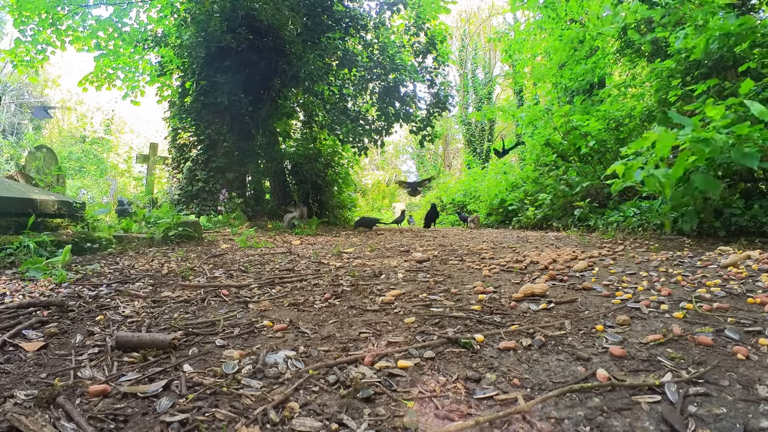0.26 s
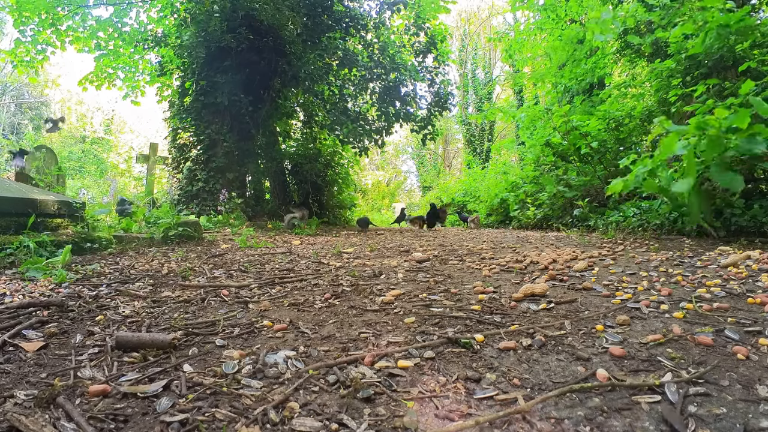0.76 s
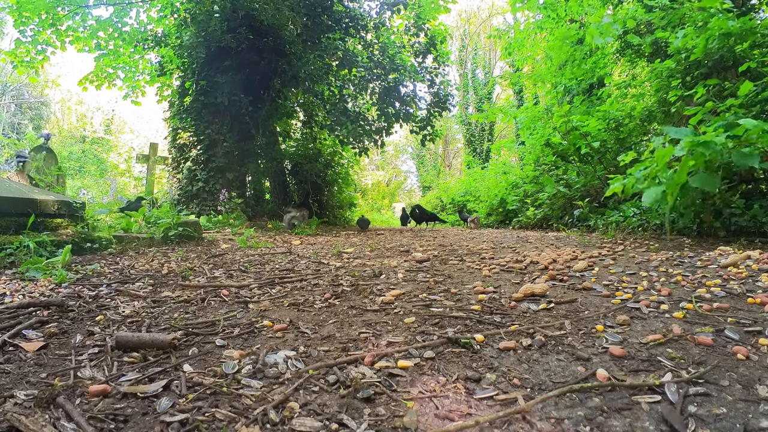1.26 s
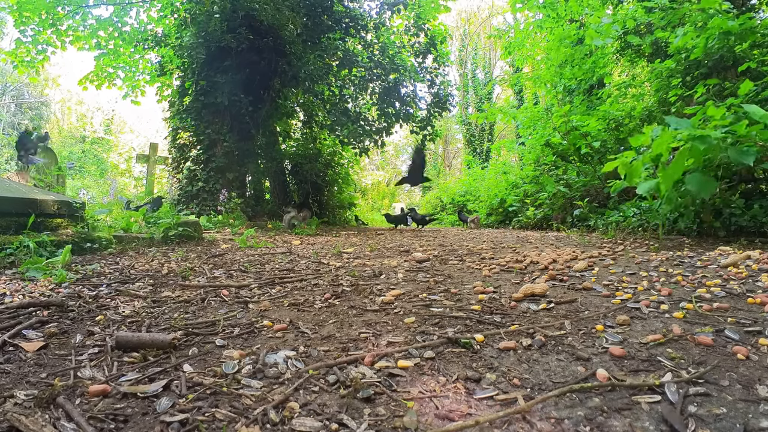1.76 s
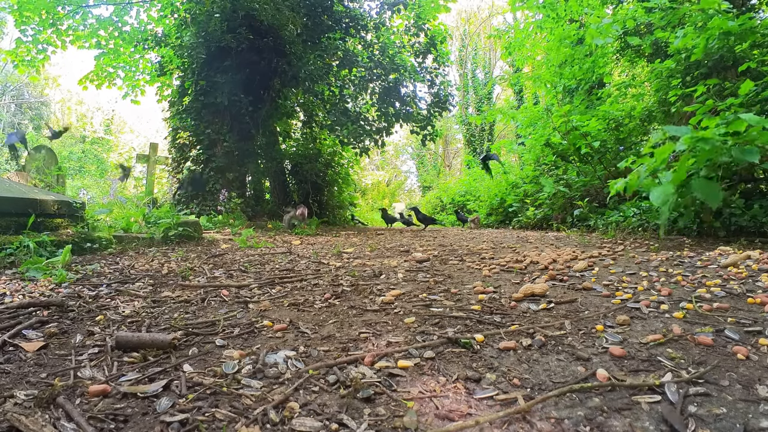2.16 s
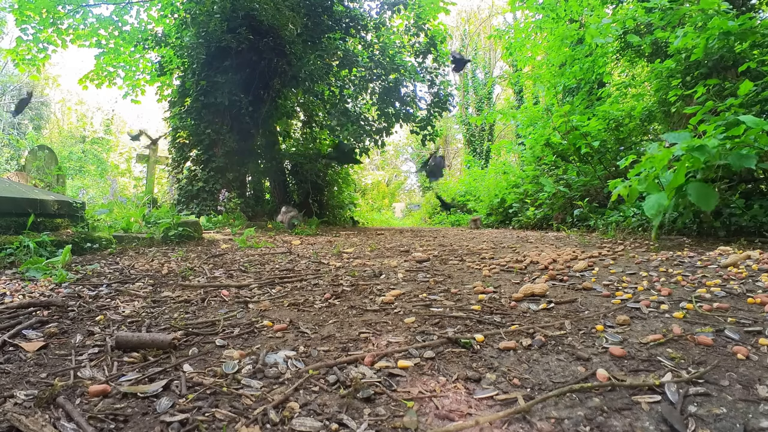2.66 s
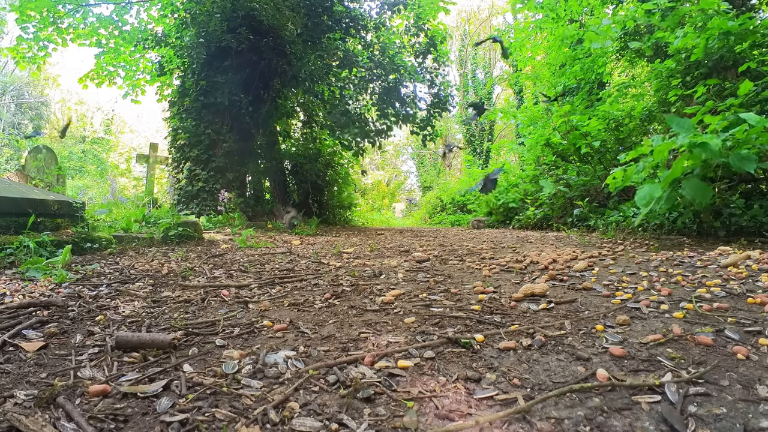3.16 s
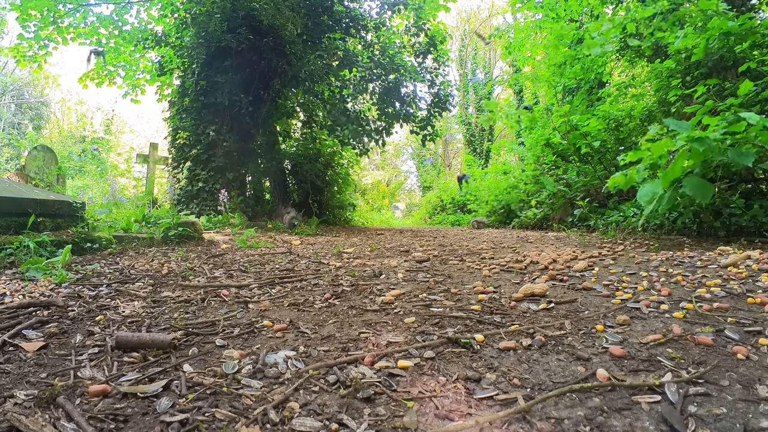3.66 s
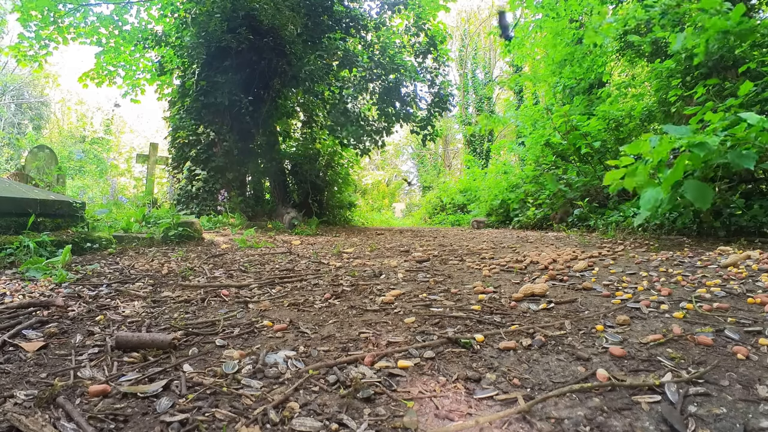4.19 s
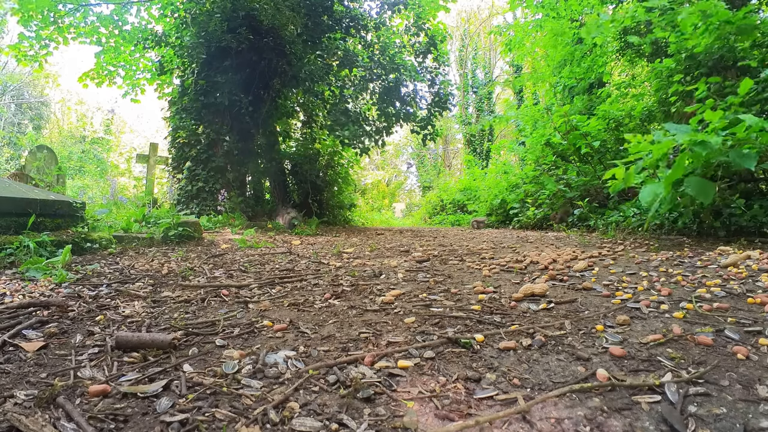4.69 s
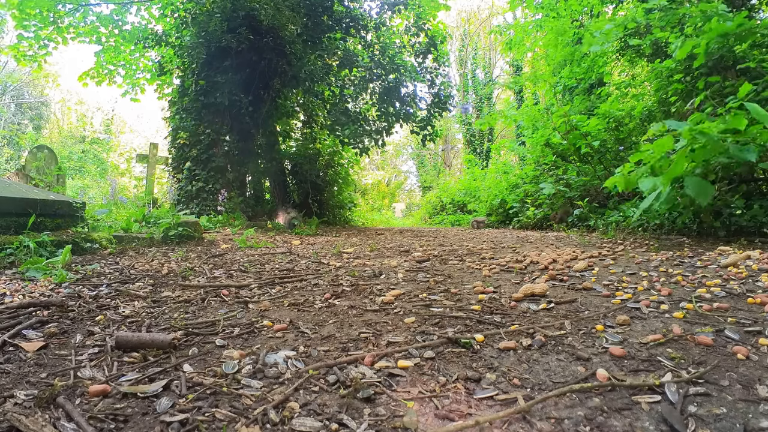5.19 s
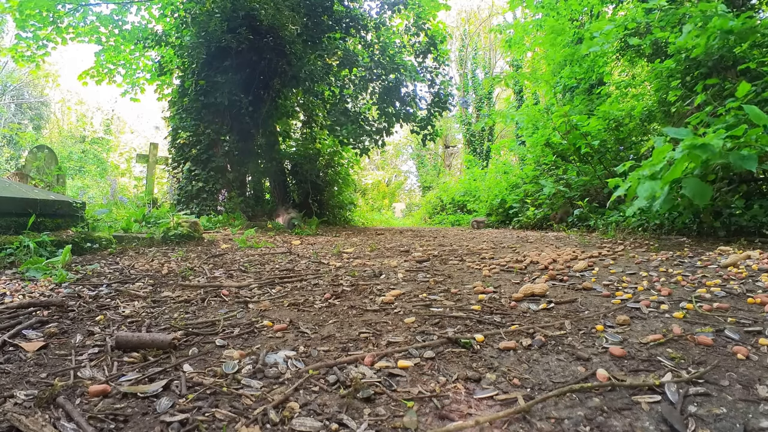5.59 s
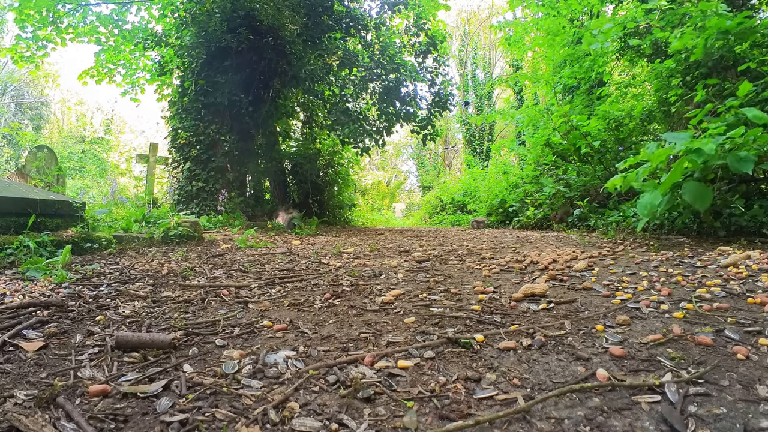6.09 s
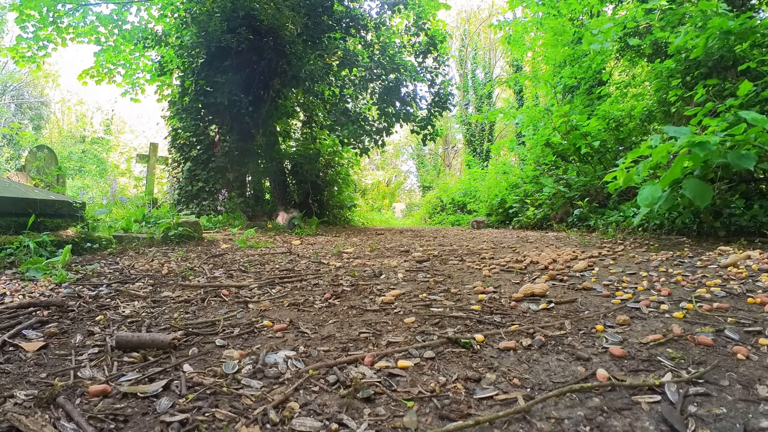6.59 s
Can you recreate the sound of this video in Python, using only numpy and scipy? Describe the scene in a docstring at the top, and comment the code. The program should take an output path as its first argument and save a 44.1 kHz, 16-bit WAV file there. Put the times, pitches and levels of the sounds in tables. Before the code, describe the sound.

Quiet woodland, with a faint hum of distant traffic and a soft hiss of leaves throughout. Light wind bumps the microphone in low buffets, strongest from about 0.3 to 1.3 seconds, among a few small rustles. From 0.9 seconds a bird in the canopy repeats a short falling call, about four a second, with a brief echo among the trunks. Near 2 seconds crows flush off the ground: wing strokes thump and swish, feathers give tiny whistles, dry leaves rustle and twigs tick. The flurry is fullest from 2.4 to 3 seconds, then thins out by about 4.5. From 3 seconds the calls turn hoarse and more widely spaced, ending just after 5 seconds. A few softer wind bumps come around then. Light breeze, scattered leaf rustles and small twig snaps continue until the end, near 7 seconds.

```python
"""Woodland. Light wind buffets the microphone over a far hum of traffic and leaves.
From 0.9 s a bird in the canopy repeats a short falling call that the trunks smear into echoes.
Near 2 s crows flush off the ground: wing strokes thump, swish and whistle, dry leaves rustle, twigs tick.
The flock thins out while the calls turn hoarse; they end after 5 s, leaving wind, rustles and snaps."""
import sys
import numpy as np
from scipy import signal
from scipy.fft import rfft, irfft, next_fast_len
from scipy.io import wavfile
from scipy.ndimage import uniform_filter1d, map_coordinates

SR = 44100
rng = np.random.default_rng(int(sys.argv[2]) if len(sys.argv) > 2 else 0)


def generate_wav(signal):
    """Clip the signal to [-1, 1] and save it as 16-bit WAV at the path in sys.argv[1]."""
    frames = np.transpose(np.atleast_2d(signal))
    scaled = np.clip(frames, -1, 1) * 32767
    pcm = np.round(scaled).astype(np.int16)
    wavfile.write(sys.argv[1], SR, pcm)


N = 301854

# Breeze in the trees. Each row: time in seconds, murmur in dB, leaf hiss in dB.
BREEZE = [(0, -65.5, -75), (.27, -70.5, -75.5), (1.2, -71, -80.5), (1.7, -75.5, -82.5),
          (1.87, -65.5, -66.5), (2.1, -75.5, -81), (3.2, -79, -71.5), (4.0, -83.5, -82), (4.6, -72.5, -81),
          (5.9, -66, -75), (6.34, -63.5, -66.5), (6.5, -67, -77.5), (6.84, -65, -75.5)]
# Common rush of the flock. Each row: time in seconds, level in dB.
FLOCK = [(0, -110), (2.0, -110), (2.15, -72), (2.45, -55), (2.6, -52), (2.75, -59), (3.05, -58.5),
         (3.2, -66), (3.8, -70), (4.3, -75.5), (4.6, -76.5), (6.84, -110)]
# Feather and leaf swishes. Each row: peak time and half length in seconds, level in dB, centre in Hz.
SWISHES = [(0.01, 0.057, -70.5, 7250), (0.125, 0.08, -76, 9560), (0.308, 0.033, -75.5, 9600),
           (0.458, 0.048, -64, 7460), (0.507, 0.019, -73, 7400), (0.937, 0.025, -68, 7000),
           (1.209, 0.0081, -66, 5500), (1.803, 0.015, -62, 5660), (1.847, 0.0044, -56, 7840),
           (1.857, 0.014, -66, 12500), (1.973, .012, -68, 12500), (1.972, 0.015, -53, 4800),
           (2.2, 0.014, -61, 5100), (2.303, 0.042, -58.5, 2820), (2.4, 0.0093, -65, 5700),
           (2.492, 0.011, -59.5, 6650), (2.799, 0.035, -60.5, 6100), (2.899, 0.018, -47, 4700),
           (2.94, 0.014, -58, 5200), (3.02, 0.0099, -61, 5840), (3.403, 0.032, -69, 6260),
           (3.668, 0.084, -70.5, 6000), (3.903, 0.016, -74, 7560), (4.018, 0.075, -72, 5540),
           (4.297, 0.063, -70, 5500), (4.859, 0.022, -59.5, 3870), (5.14, 0.027, -72, 6270),
           (5.38, 0.021, -76.5, 6800), (5.454, 0.0057, -64.5, 5370), (5.476, 0.023, -66, 5100),
           (5.843, 0.016, -62.5, 6640), (6.166, 0.024, -63.5, 6740), (6.227, 0.017, -60, 4170),
           (6.31, 0.039, -53.5, 3940), (6.418, 0.035, -64, 6500), (6.462, 0.028, -64, 3900),
           (6.621, 0.018, -74.5, 9000), (6.76, 0.0091, -70, 2720)]


def amp(db):
    """Decibels to gain."""
    return 10 ** (np.asarray(db) / 20)


def unit(x):
    """Scaled to rms 1."""
    return x / np.sqrt(np.mean(x ** 2) + 1e-20)


def bell(x, width):
    """Gaussian of height 1."""
    return np.exp(-.5 * (x / width) ** 2)


def along(points, hz):
    """Interpolates (Hz, value) points on a log axis."""
    f, v = np.transpose(points)
    return np.interp(np.log(hz + 1), np.log(f + 1), v)


def curves(rows):
    """One value per sample for each column after the time."""
    s, *cols = np.transpose(rows)
    return [np.interp(np.arange(N) / SR, s, c) for c in cols]


def wobble(rate_hz, size=N):
    """Smooth random curve, rate_hz knots a second."""
    knots = rng.standard_normal(int(size * rate_hz / SR) + 4)
    return map_coordinates(knots, [np.arange(size) * rate_hz / SR])


def phase_of(hz):
    """Running phase in radians."""
    return 2 * np.pi * np.cumsum(hz) / SR


def filtered(x, response):
    """Applies a complex frequency response."""
    m = next_fast_len(len(x) + 8192)
    return irfft(rfft(x, m) * response(np.fft.rfftfreq(m, 1 / SR)), m)[:len(x)]


def shaped(x, spectrum):
    """Filtered by (Hz, dB) points, rms 1."""
    return unit(filtered(x, lambda hz: amp(along(spectrum, hz))))


def add(track, s, sound):
    """Mixes a sound in at s seconds."""
    part = track[max(round(s * SR), 0):][:len(sound)]
    part += sound[:len(part)]


def rush(spectrum, patchy_db):
    """Noise of rms 1 with patches of random gain."""
    z = signal.stft(rng.standard_normal(N), nperseg=512)[2]
    patches = uniform_filter1d(uniform_filter1d(rng.standard_normal(z.shape), 6, 0), 10, 1)
    noise = signal.istft(z * amp(patchy_db * unit(patches)), nperseg=512)[1][:N]
    return shaped(noise, spectrum)


def puffs(rows, octaves, grain_db, grain_hz, rise):
    """Bursts of turbulent band noise; rise is attack time over fade time."""
    out = np.zeros(N)
    for s, half_s, db, hz in rows:
        reach_s = 4 * half_s + .03
        t = np.arange(-min(s, reach_s) * SR, reach_s * SR) / SR
        grainy = rng.standard_normal(len(t)) * amp(grain_db * wobble(grain_hz, len(t)))
        air = filtered(grainy, lambda f: bell(np.log2((f + 1) / hz), octaves))
        envelope = bell(t, np.where(t < 0, rise * half_s, half_s))
        add(out, s + t[0], amp(db) * unit(air * envelope) * np.sqrt(np.mean(envelope ** 2)))
    return out


def echoes(x, direct_db, wet_db, build_s=.014):
    """Echo among trunks: it gathers briefly, then each frequency dies at its own speed."""
    # Each row: frequency in Hz, time to fall 60 dB in seconds.
    decay = [(300, 0.051), (3000, 0.43), (10000, 0.33)]
    hz, t, z = signal.stft(rng.standard_normal(SR // 2), SR, nperseg=256)
    envelope = amp(-60 * t / along(decay, hz)[:, None]) * (1 - np.exp(-t / build_s))
    tail = signal.istft(z * envelope, SR, nperseg=256)[1]
    wet = signal.fftconvolve(x, tail / np.linalg.norm(tail))
    return amp(wet_db) * wet + amp(direct_db) * np.pad(x, (0, len(wet) - len(x)))


def background():
    """Wind rumble, far murmur of traffic and trees, and leaf hiss, each drifting a little."""
    # Noise spectra. Each row: frequency in Hz, relative density in dB.
    rumble = [(25, -28), (60, 4), (100, 4), (190, 1.5), (320, -10.5), (500, -23.5), (700, -50), (1100, -54)]
    murmur = [(150, 0), (250, 3.5), (384, -1.5), (560, -2.5), (800, -8.5), (1600, -7), (3560, -17),
              (4000, -26.5), (5200, -11.5), (8800, -120)]
    hiss = [(1500, -50), (2500, -0.5), (4000, -3.5), (6000, -7), (9000, -9), (12500, -19.5), (13500, -19),
            (15600, -36)]
    # Wind at the microphone. Each row: time in seconds, rumble in dB.
    gusts = [(0, -57), (.27, -54), (.55, -44.5), (.76, -74), (1.0, -52.5), (1.25, -58.5), (1.45, -64),
             (1.9, -61), (2.0, -61.5), (2.05, -71.5), (2.2, -63), (2.44, -56), (2.65, -53.5), (2.95, -62),
             (3.3, -66), (3.8, -70), (4.6, -74), (4.95, -68.5), (5.9, -72), (6.34, -64.5), (6.45, -75),
             (6.84, -81)]
    rumble_db, = curves(gusts)
    murmur_db, hiss_db = curves(BREEZE)
    low = amp(rumble_db + 1.6 * wobble(11)) * rush(rumble, patchy_db=3)
    middle = amp(murmur_db + 1.45 * wobble(4.97)) * rush(murmur, patchy_db=2.5)
    high = amp(hiss_db + 1.2 * wobble(8)) * rush(hiss, patchy_db=.8)
    return low + middle + high


def wind():
    """Lumps of low turbulence on the microphone, each with a shorter, higher edge."""
    # Each row: peak time and half length in seconds, level in dB, centre in Hz.
    buffets = [(0.328, 0.0093, -31, 141), (0.363, 0.0073, -39, 108), (0.38, 0.024, -32.5, 119),
               (0.427, 0.014, -38.5, 140), (.468, 0.031, -39.5, 113), (0.504, 0.0078, -40.5, 150),
               (0.532, 0.0068, -32, 190), (0.598, 0.063, -43, 92), (0.684, 0.012, -43, 113),
               (0.786, 0.024, -43.5, 82), (0.955, 0.087, -55, 92.5), (1.092, 0.014, -45.5, 94),
               (1.208, 0.038, -45.5, 118), (1.276, 0.013, -34.5, 111), (1.35, 0.024, -50, 87),
               (1.458, 0.014, -59, 99), (1.712, 0.021, -58, 93), (1.824, 0.021, -54, 100),
               (4.821, 0.02, -53, 93), (4.896, 0.033, -56, 121), (5.069, 0.011, -49, 78),
               (5.159, 0.023, -44.5, 87), (5.274, 0.0186, -59.5, 90), (5.497, 0.018, -61, 118),
               (6.672, 0.007, -49.5, 99)]
    edges = [(s, .6 * half_s, db - 7.5 + 11 * np.log2(hz / 150), 1.69 * hz)
             for s, half_s, db, hz in buffets]
    return (puffs(buffets, octaves=.59, grain_db=4.5, grain_hz=54.6, rise=.66)
            + puffs(edges, octaves=.64, grain_db=5, grain_hz=47, rise=.65))


def squeaks():
    """Faint breathy squeaks of narrow-band noise."""
    # Each row: peak time and half length in seconds, level in dB, centre in Hz.
    bursts = [(.072, 0.019, -62.5, 5730), (.075, 0.012, -67, 4900), (.32, 0.017, -76, 5500),
              (2.305, 0.012, -52, 2300), (6.315, 0.031, -57, 2880), (6.31, 0.0217, -63.5, 4870),
              (6.462, 0.018, -63.5, 2900), (6.635, 0.013, -65, 3350), (6.64, 0.017, -67, 4800),
              (6.725, .012, -69, 1820), (6.82, 0.011, -74, 1620)]
    return puffs(bursts, octaves=.09, grain_db=-4.5, grain_hz=93, rise=.65)


def crackle(band_ticks_per_s=1200, spread_db=4):
    """Fine ticks of leaf and quill that follow the swishes, the flock and the breeze."""
    # Tick spectrum. Each row: frequency in Hz, relative density in dB.
    spectrum = [(1500, -30), (3000, -2.5), (6000, 6.5), (10000, -3), (15600, -28)]
    # Band centres in Hz.
    bands_hz = (3500, 5500, 8000, 11000)
    t, ticks = np.arange(N) / SR, np.zeros(N)
    for centre_hz in bands_hz:
        hits = rng.random(N) < band_ticks_per_s / SR
        sizes = amp(spread_db * rng.exponential(size=N).clip(0, 3)) * rng.standard_normal(N)
        band = lambda hz: amp(along(spectrum, hz)) * bell(np.log2((hz + 1) / centre_hz), .3)
        ticks += filtered(hits * sizes, band)
    stir = sum(amp(db - 11.5) * bell(t - s, half_s) for s, half_s, db, _ in SWISHES)
    flock_db, hiss_db = curves(FLOCK)[0], curves(BREEZE)[1]
    return (stir + amp(flock_db - 13.5) + amp(hiss_db - 10)) * unit(ticks)


def swishes():
    """Feathers and dry leaves brush: separately crackling bands under a thin hiss."""
    # Band offsets from the centre in octaves.
    offsets = (-.6, -.2, .2, .6)
    bands = [(s, half_s, db - 3 - 12 * up ** 2, hz * 2 ** up)
             for s, half_s, db, hz in SWISHES for up in offsets]
    hiss = [(s, half_s, db - 11.5, 8500) for s, half_s, db, _ in SWISHES]
    return (puffs(bands, octaves=.2, grain_db=3.5, grain_hz=100, rise=.51)
            + puffs(hiss, octaves=.21, grain_db=-6.5, grain_hz=330, rise=.38))


def twigs(crack_t60_s=.004, splinter_t60_s=.05):
    """Twigs and leaves snap: a sharp crack with a short splintering tail."""
    # Each row: start in seconds, peak in dB, centre in Hz.
    snaps = [(0.4594, -39, 7850), (0.5045, -42, 7800), (1.8438, -43.5, 3280), (1.962, -54, 3880),
             (1.9703, -45, 3050), (2.4005, -50, 6000), (2.444, -47, 6000), (2.573, -50, 5930),
             (2.873, -41, 4900), (2.895, -35, 3940), (2.9, -31, 5000), (2.999, -54, 5000),
             (3.013, -38.5, 5600), (3.0398, -30, 4800), (3.1642, -49, 3810), (3.3997, -50.5, 3800),
             (5.4462, -49, 5970), (5.817, -51, 3300), (5.8312, -50, 8000), (5.835, -46, 8000),
             (6.1496, -50, 6500), (6.153, -45, 7000), (6.1762, -43.5, 7300), (6.217, -48.5, 2550),
             (6.4178, -39.5, 6300), (6.752, -47.5, 2720)]
    t, out = np.arange(SR // 20) / SR, np.zeros(N)
    envelope = amp(-60 * t / crack_t60_s) + amp(-12 - 60 * t / splinter_t60_s)
    for s, db, hz in snaps:
        burst = rng.standard_normal(len(t)) * envelope
        bandpass = lambda f: 1j * f * hz / (hz * hz - f * f + 1j * f * hz)
        crack = filtered(burst, lambda f: bandpass(f) ** 2 / (1 + 1j * f / 9000) ** 3)
        add(out, s, amp(db) * crack / np.abs(crack).max())
    return out


def peep(length_s=.063, start_hz=2920, end_hz=2640):
    """A nearly pure falling note before the bird's first call."""
    # Each row: start in seconds, level in dB.
    notes = [(0.849, -63)]
    u, out = np.linspace(0, 1, round(length_s * SR)), np.zeros(N)
    phase = phase_of(start_hz + (end_hz - start_hz) * u)
    tone = (np.sin(phase) + amp(-20) * np.sin(2 * phase)) * np.sin(np.pi * u) ** .69
    for s, db in notes:
        add(out, s, echoes(amp(db) * tone, direct_db=6.5, wet_db=6.5))
    return out


def bird(hook_share=.16, settle_s=.011, bend_clear=1.6, bend_hoarse=.1984):
    """Harmonic calls shaped by the throat: each hooks up, then falls, shaking, with growing rasp."""
    # Each row: start and length in seconds, start and end pitch in Hz, level in dB, hoarseness 0-1,
    # fundamental and upper partials in dB, swell peak as share of length, scoop and overshoot as
    # shares of pitch.
    calls = [(0.896, 0.082, 2024, 1570, -52, 0.04, -14.5, -8.5, 0.72, 0.0057, 0.014),
             (1.136, 0.1, 1718, 1406, -60.5, 0.12, -27, -2, 0.48, 0.069, 0.081),
             (1.37, 0.12, 1742, 1325, -58.5, 0.15, -10, -4.5, 0.52, 0.14, 0.035),
             (1.613, 0.105, 1770, 1287, -61, 0, -20.5, -3.5, 0.49, 0.27, 0.064),
             (1.856, 0.11, 1730, 1302, -62.5, 0.05, -17, 0.5, 0.36, 0.26, 0.082),
             (2.092, 0.13, 1760, 1255, -59.5, 0.09, -19, -5, 0.47, .2, 0.18),
             (2.358, 0.056, 1943, 1576, -53, 0.27, -19, -7, 0.82, .12, .01),
             (2.609, 0.075, 1910, 1596, -61.5, 0.22, -19, 0, 0.47, 0.089, 0.012),
             (3.044, 0.11, 2186, 1582, -62.5, 0.58, -9.5, -1, 0.18, .2, 0.013),
             (3.281, 0.13, 2290, 1678, -65.5, 0.65, -17, -6, 0.37, 0.13, .03),
             (3.643, 0.12, 2295, 1541, -63.5, 0.8, -12, -11, 0.39, 0.069, 0.019),
             (3.911, 0.14, 2305, 1473, -64.5, 0.78, -13.5, -20, 0.36, 0.086, 0.035),
             (4.19, 0.15, 2300, 1506, -60, 0.67, -17.5, -18, 0.52, 0.14, 0.044),
             (4.727, 0.14, 2415, 1518, -55.5, 0.5, -22.5, -18, 0.53, .16, .05),
             (5.033, 0.14, 2292, 1516, -59.5, 0.57, -12.5, -16, 0.4, 0.13, 0.039)]
    # Throat and beak response. Each row: frequency in Hz, gain in dB.
    throat = [(1000, -61), (1500, 0), (1900, 0.5), (2400, 9), (2900, 3), (3700, 2.5), (4300, -3.5),
              (5100, 2.5), (6000, -5.5), (6700, -20), (7500, -32), (8300, -32), (10000, -45),
              (13000, -61.5)]
    # The rasp and its thin top. Each row: frequency in Hz, relative density in dB.
    rasp_spectrum = [(2000, -23), (2600, -3), (3000, 6.5), (3600, 11), (4800, -8), (5400, 0), (6600, -8.5),
                     (7200, -37), (10000, -24), (12000, -96)]
    shrill_spectrum = [(6500, -38), (7600, 6), (8500, -7), (9800, 0), (11000, -40)]
    out = np.zeros(N)
    for s, length_s, start_hz, end_hz, db, hoarseness, first_db, upper_db, peak, scoop, over in calls:
        n = round(length_s * SR)
        u = np.linspace(0, 1, n)
        hook = 1 - scoop * np.clip(1 - u / hook_share, 0, 1)
        past_hook = np.clip(u - hook_share, 0, 1)
        bend = max(bend_clear + (bend_hoarse - bend_clear) * hoarseness, .3)  # under 1 falls early
        fall = (past_hook / (1 - hook_share)) ** bend
        overshoot = 1 + over * np.exp(-past_hook * length_s / settle_s)
        glide_hz = (start_hz + (end_hz - start_hz) * fall) * hook * overshoot
        hoarse = min(hoarseness, .7) * u ** .4
        shake = 1 + (.012 + .045 * hoarse) * wobble(350, n)
        phase = phase_of(glide_hz * shake)
        voice = np.zeros(n)
        for k, partial_db in enumerate([first_db - 3 * u, 0] + [upper_db] * 4, 1):
            shiver_db = 4 * np.sqrt(u) * wobble(700, n)
            voice += amp(along(throat, k * glide_hz) + partial_db + shiver_db) * np.sin(k * phase)
        held_hz = 2 * start_hz * (1 + over) * (1 - .031 * u) * hook * shake
        voice += amp(-3.5) * hoarseness * np.sin(phase_of(held_hz))  # a held tone lingers near twice the start pitch
        voice += amp(6) * hoarse * wobble(460, n) * np.sin(2 * phase)  # grainy second partial
        voice *= 1 + amp(-6.5) * u * wobble(900, n)  # flutter
        rasp = amp(1) * shaped(rng.standard_normal(n), rasp_spectrum)
        rasp += amp(-16) * shaped(rng.standard_normal(n), shrill_spectrum)
        skew = np.log(.5) / np.log(np.clip(peak, .2, .9))
        swell = np.abs(np.sin(np.pi * u ** skew)) ** (.45 + .7 * hoarseness)
        gain = amp(db + 2.5 * wobble(250, n)) * swell
        add(out, s, echoes(gain * (voice + hoarse * rasp), direct_db=3, wet_db=1.5))
    return out


def wings(push_hz=228):
    """The flock's rush, downstrokes that throw air on a low push, and hollow knocks of cupped wings."""
    # Rush spectrum. Each row: frequency in Hz, relative density in dB.
    feathers = [(150, -13), (350, 6), (650, -3), (1100, -10), (2500, -7.5), (4500, -5.5), (9000, -23),
                (13000, -24), (15600, -28)]
    # Downstrokes. Each row: peak time in seconds, level in dB, centre in Hz.
    strokes = [(1.867, -56.5, 634), (1.973, -49, 710), (2.314, -56, 540), (2.409, -51, 600),
               (2.449, -48.5, 540), (2.519, -47.5, 446), (2.644, -57, 390), (2.791, -52.5, 490),
               (2.899, -46.5, 545), (2.943, -58, 510), (3.014, -63.5, 650), (3.044, -52, 640),
               (3.1, -64.5, 504), (3.188, -62.5, 454), (3.287, -67, 412), (3.558, -66, 382),
               (3.707, -59, 265), (4.02, -71, 440), (5.479, -64, 1030)]
    # Cupped wings. Each row: peak time and half length in seconds, level in dB, centre in Hz.
    knocks = [(1.973, 0.011, -61, 815), (2.091, 0.0078, -53.5, 610), (2.245, 0.009, -52.5, 745),
              (2.45, .008, -53, 594), (2.52, .009, -52, 417)]
    flock_db, = curves(FLOCK)
    thumps = [(s, .0089 * amp(-.23 * (db + 49.5)), db, hz) for s, db, hz in strokes]  # fainter is longer
    pushes = [(s, half_s, db, push_hz) for s, half_s, db, _ in thumps]
    return (amp(flock_db + 1.8 * wobble(40)) * rush(feathers, patchy_db=3)
            + puffs(thumps, octaves=.72, grain_db=5, grain_hz=160.4, rise=.71)
            + puffs(pushes, octaves=.58, grain_db=-1.5, grain_hz=54, rise=.99)
            + puffs(knocks, octaves=.2, grain_db=1.5, grain_hz=100, rise=.8))


def feather_whistles():
    """A flight feather sounds a brief, unsteady falling tone on the stroke."""
    # Each row: peak time and half length in seconds, level in dB, pitch in Hz, share of pitch lost
    # per half length.
    whistles = [(2.41, 0.0048, -57.5, 1725, .05), (2.482, 0.0084, -53, 2380, 0.044),
                (2.556, 0.0046, -53, 2296, 0.031), (2.692, 0.0064, -51.5, 2250, 0.06),
                (2.8, 0.011, -51, 1997, 0.091), (3.183, 0.0096, -67, 1807, .02),
                (3.276, 0.006, -82, 1740, .02), (3.324, 0.009, -67.5, 1790, 0.0094),
                (3.382, 0.0054, -76, 1770, .02), (3.472, 0.0076, -69, 1780, 0.016),
                (3.611, 0.0094, -71, 1770, 0.024), (3.776, 0.0074, -70.5, 1816, 0.01),
                (4.382, 0.0089, -74.5, 1660, 0.014), (4.487, 0.0109, -68, 1336, 0.026),
                (5.037, 0.0076, -65, 1436, .03), (6.223, 0.0075, -63, 2335, 0.027)]
    t, out = np.arange(-.06 * SR, .06 * SR) / SR, np.zeros(N)
    for s, half_s, db, hz, drop in whistles:
        glide_hz = hz * (1 - drop * np.clip(t / half_s, -2, 2))
        shake = 1 + (.045 + drop) * wobble(500, len(t))
        tone = np.sin(phase_of(glide_hz * shake)) * bell(t, half_s)
        add(out, s + t[0], echoes(amp(db) * tone, direct_db=7.5, wet_db=-4))
    return out


def scene():
    """All sources at one microphone."""
    air = background() + wind()
    flush = wings() + feather_whistles() + swishes() + twigs() + crackle()
    return (air + flush + peep() + bird() + squeaks())[None]


def record(dry, bass_hz=45, treble_hz=14000, limit_hz=15660):
    """Rolls off deep bass and high treble; nothing passes above the band limit."""
    rolloff = lambda hz: 1 / np.sqrt((1 + (bass_hz / (hz + 1)) ** 6) * (1 + (hz / treble_hz) ** 12))
    return filtered(dry[0], lambda hz: (hz < limit_hz) * rolloff(hz))[None]


dry = scene()
out = record(dry)
generate_wav(out)
```